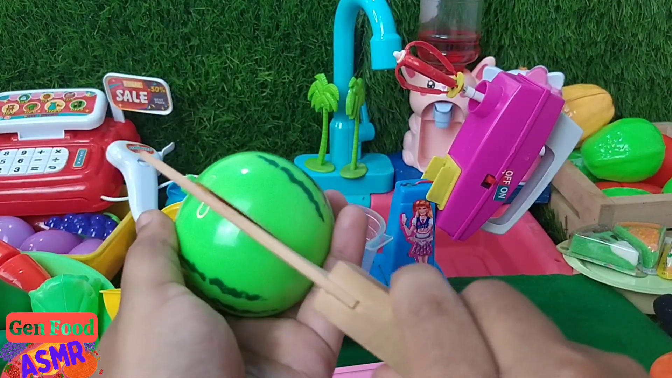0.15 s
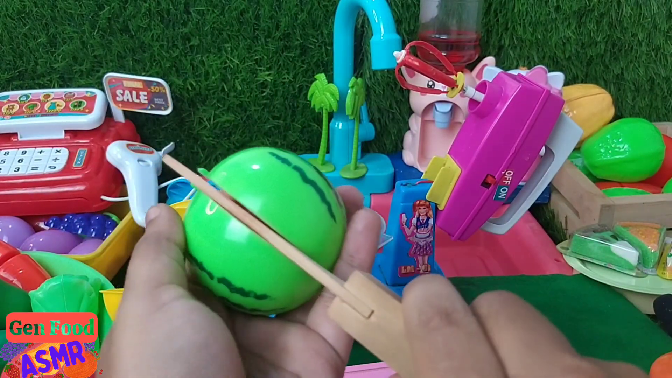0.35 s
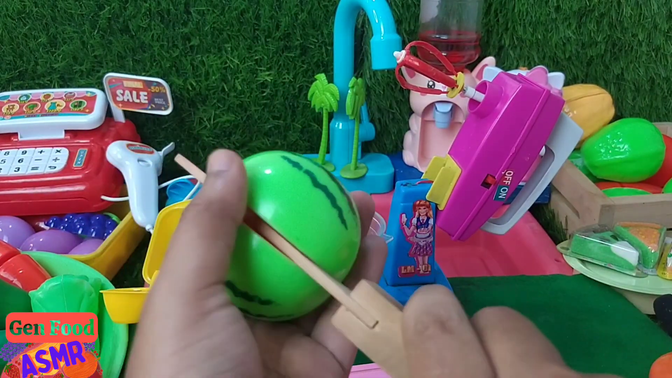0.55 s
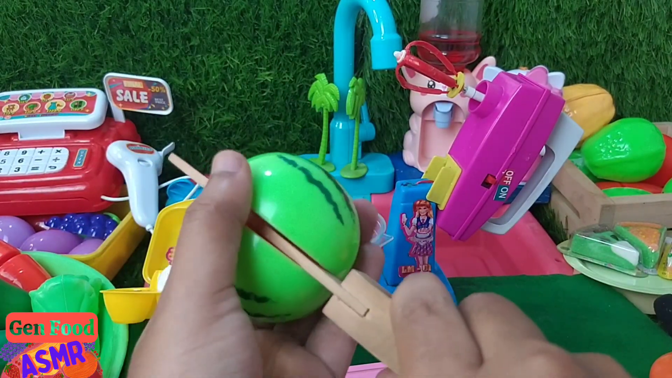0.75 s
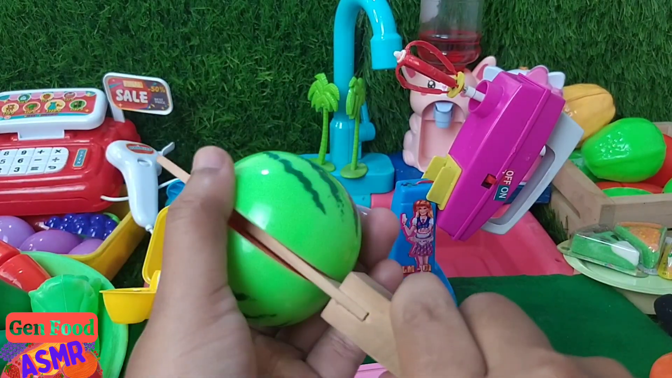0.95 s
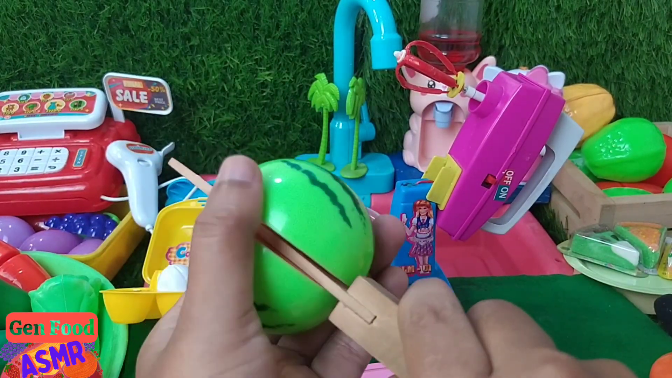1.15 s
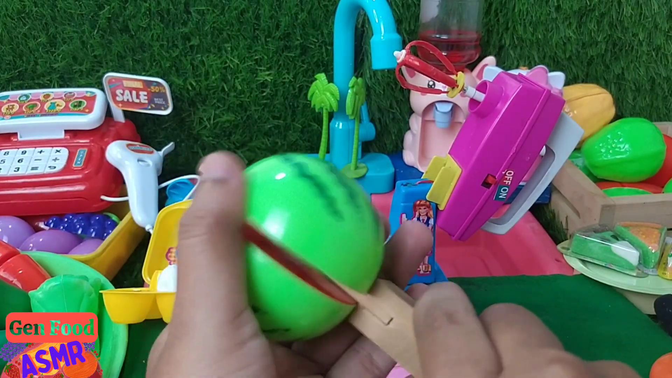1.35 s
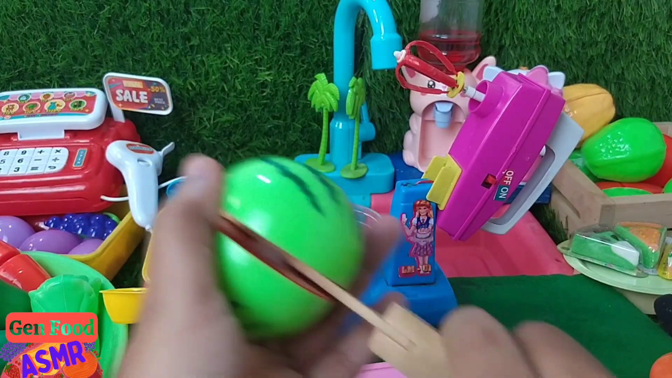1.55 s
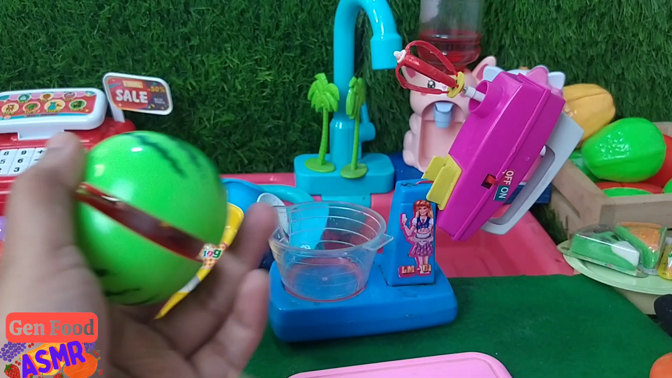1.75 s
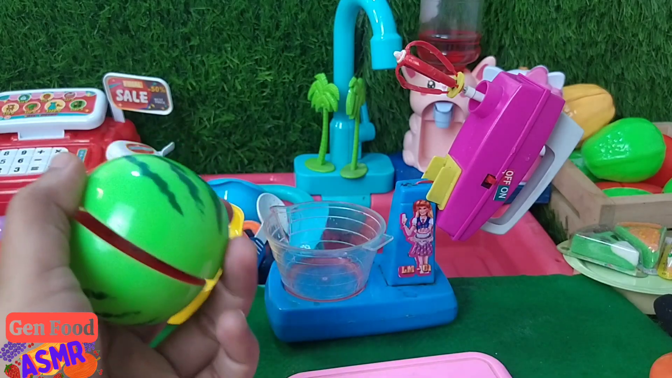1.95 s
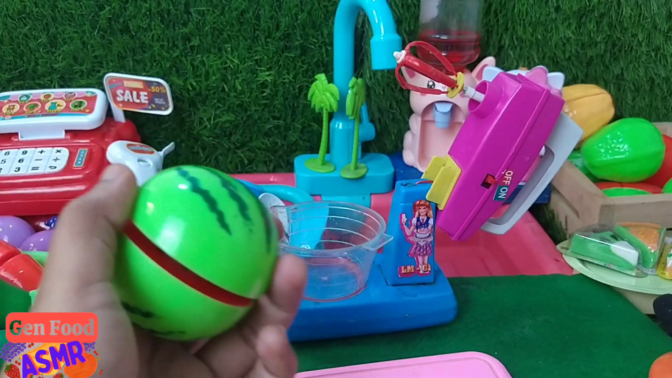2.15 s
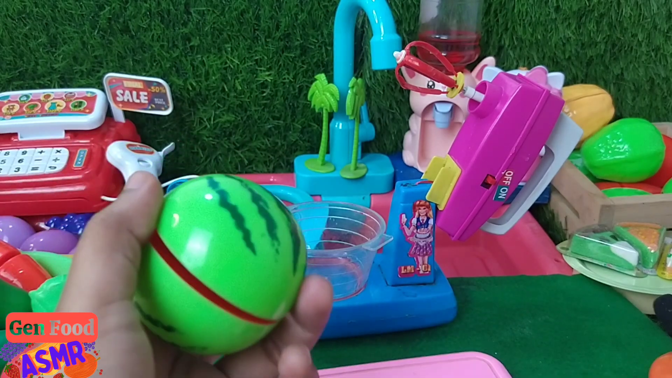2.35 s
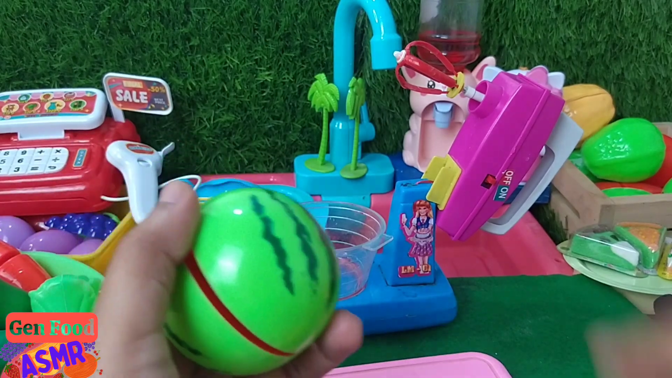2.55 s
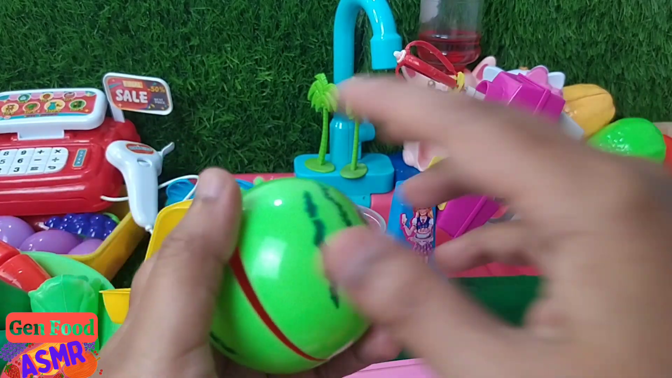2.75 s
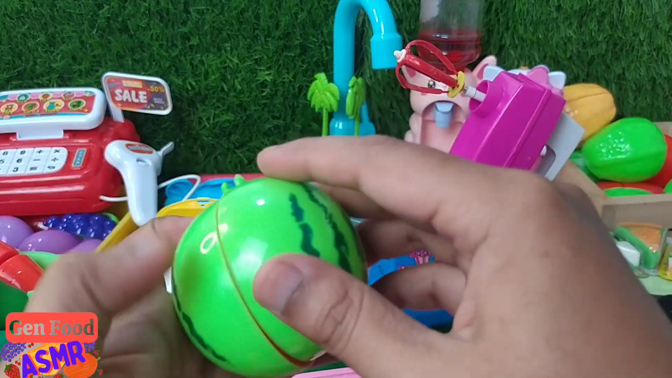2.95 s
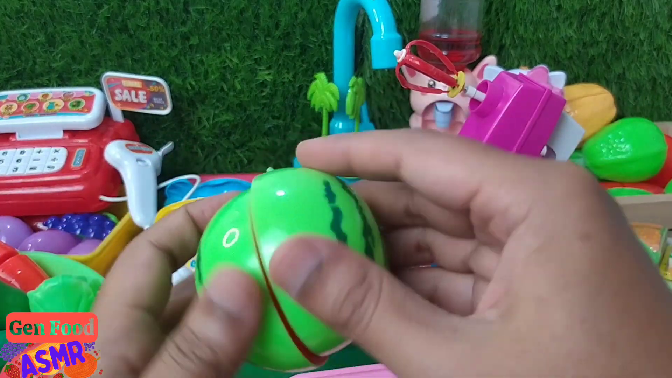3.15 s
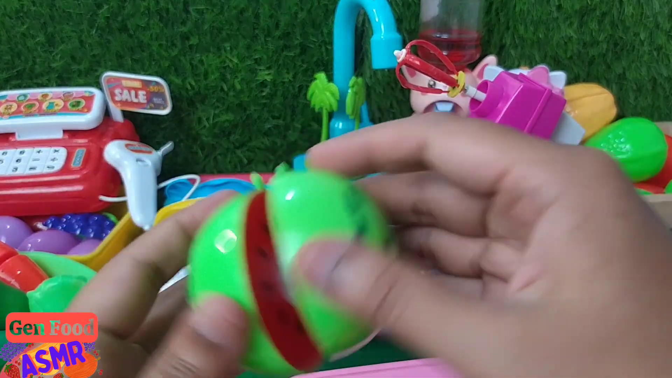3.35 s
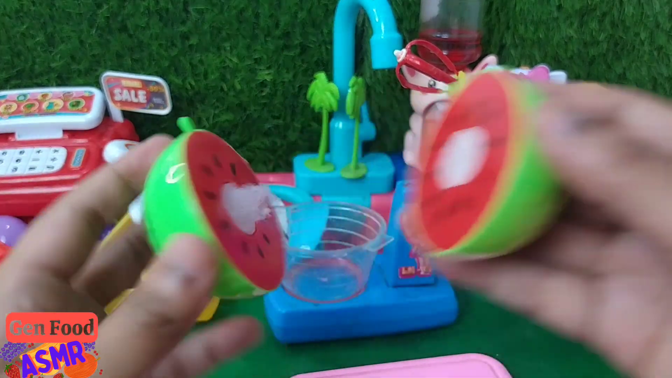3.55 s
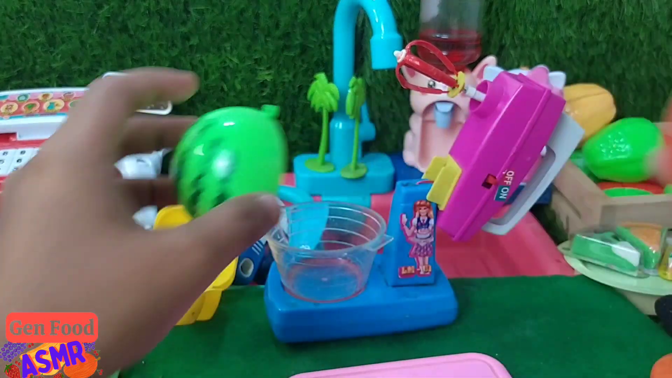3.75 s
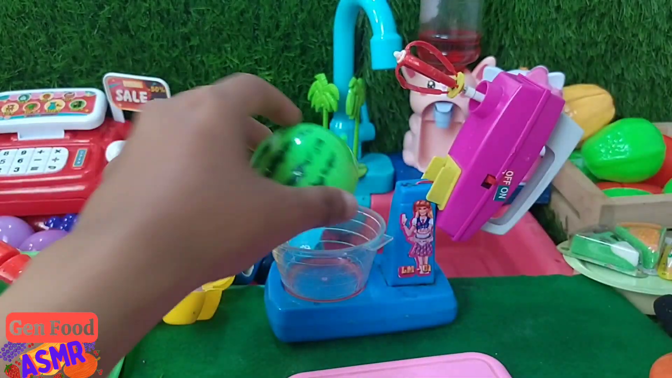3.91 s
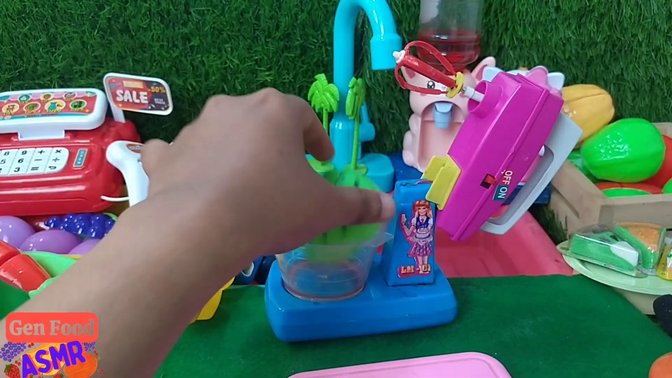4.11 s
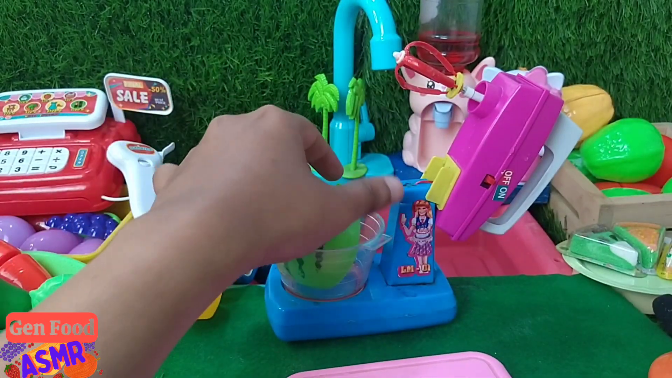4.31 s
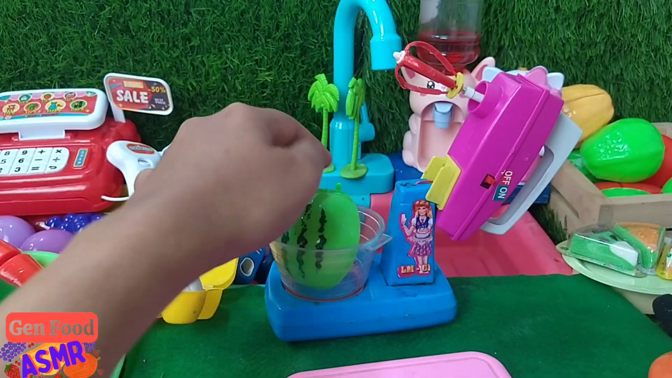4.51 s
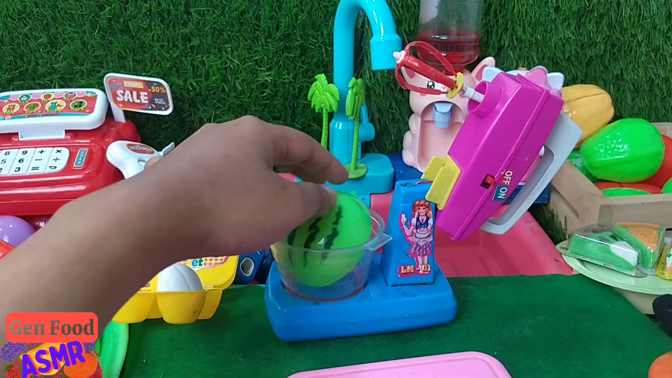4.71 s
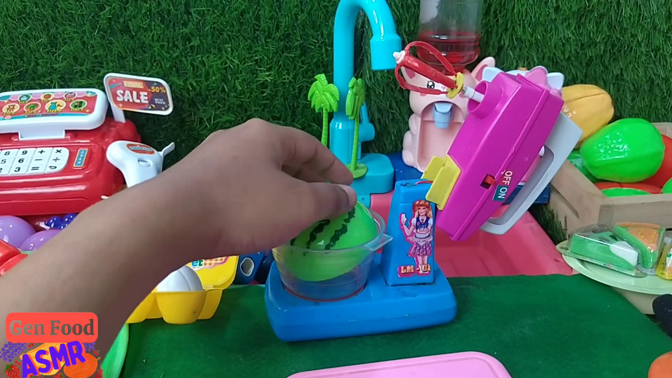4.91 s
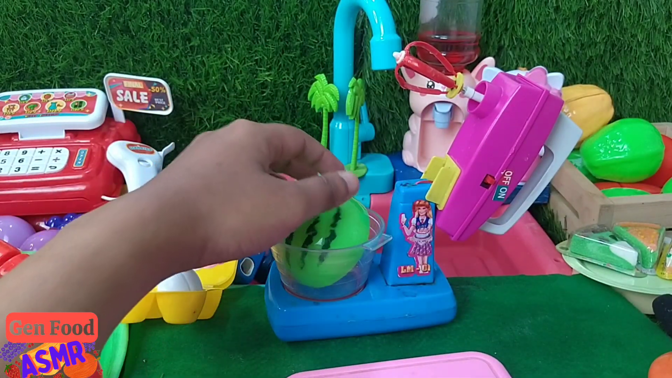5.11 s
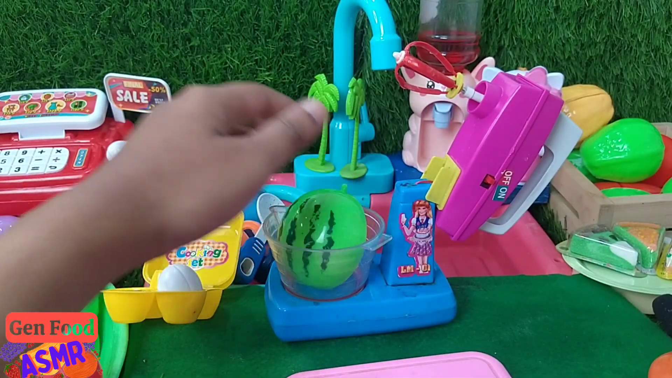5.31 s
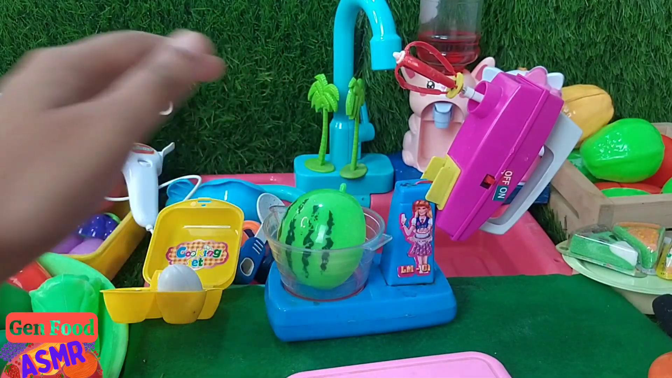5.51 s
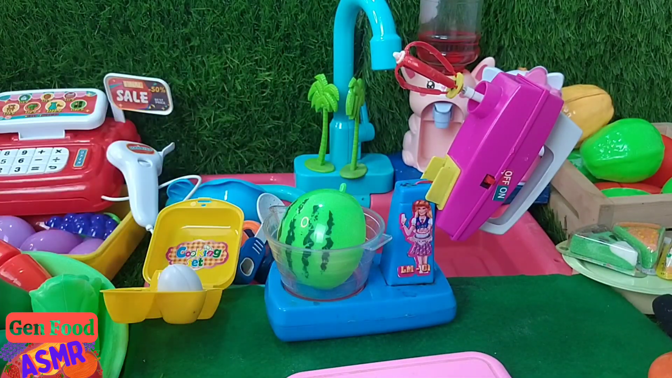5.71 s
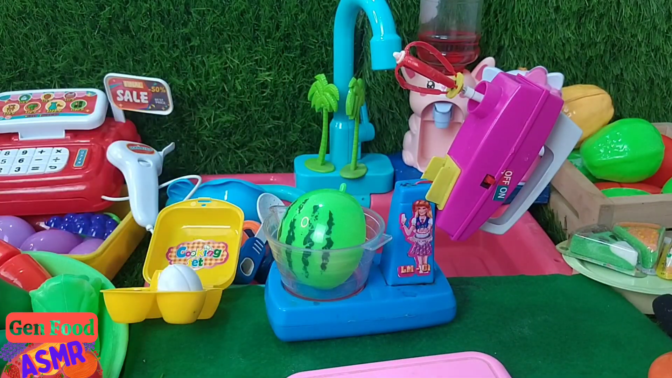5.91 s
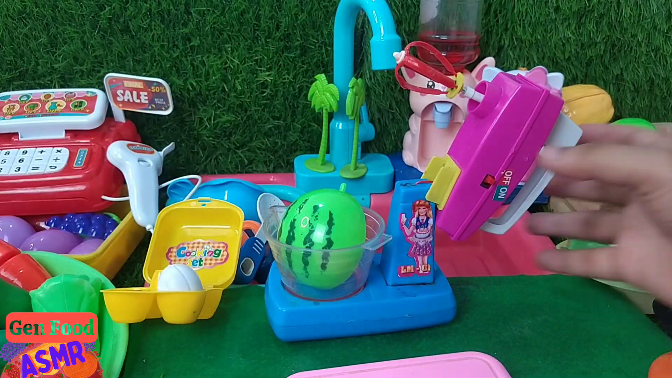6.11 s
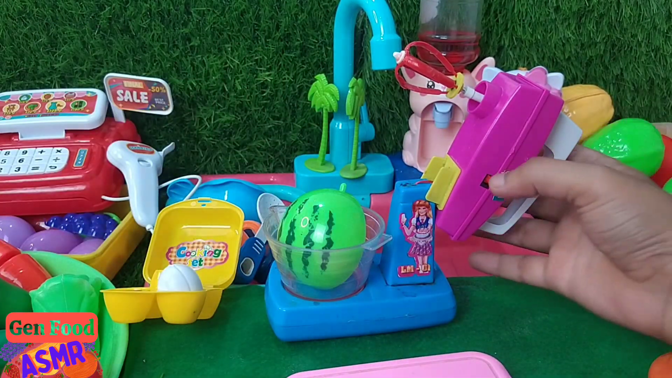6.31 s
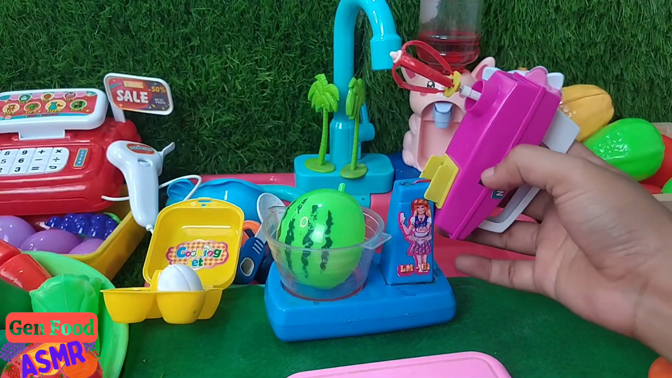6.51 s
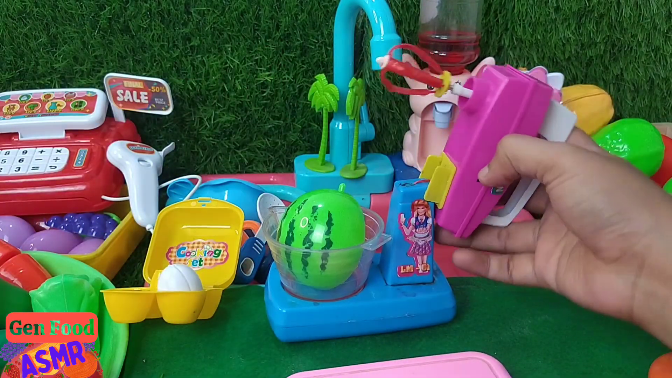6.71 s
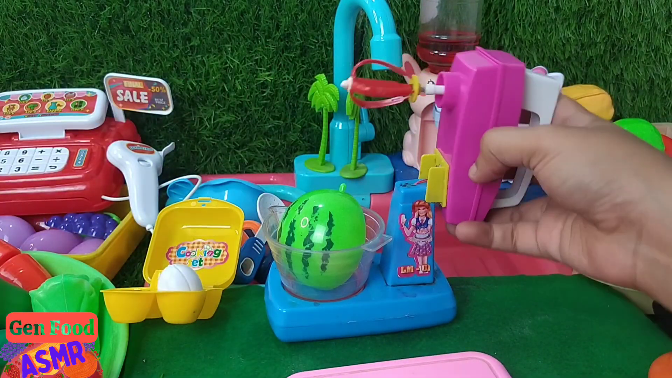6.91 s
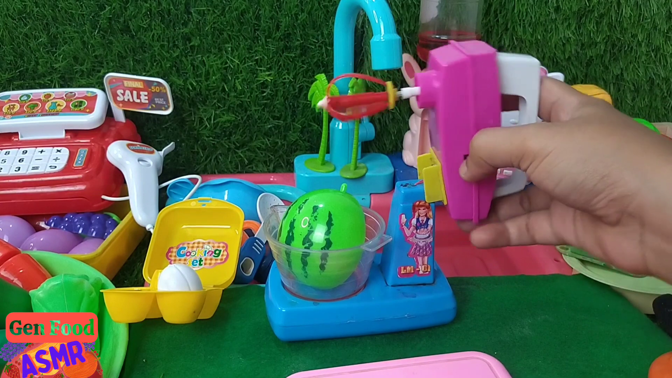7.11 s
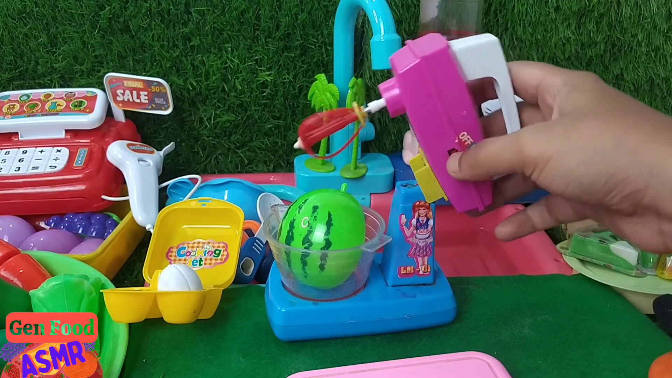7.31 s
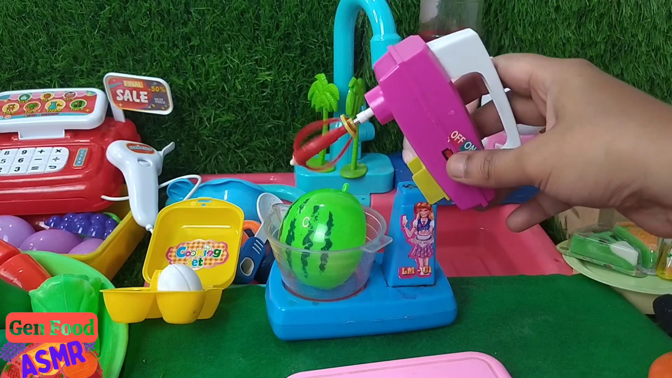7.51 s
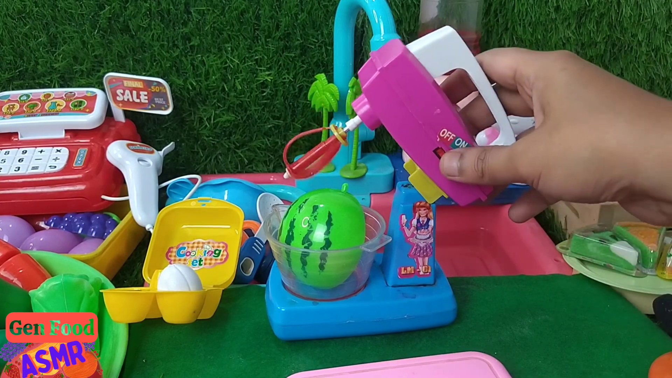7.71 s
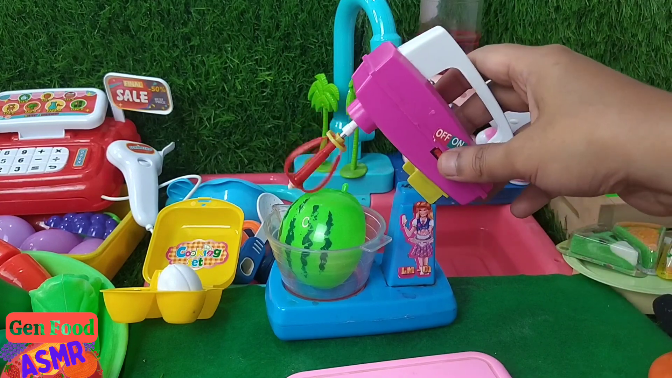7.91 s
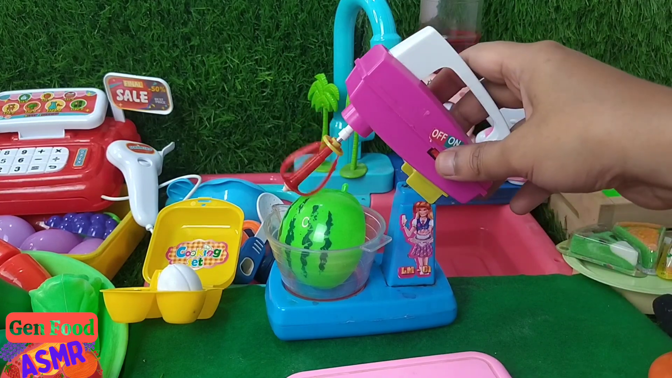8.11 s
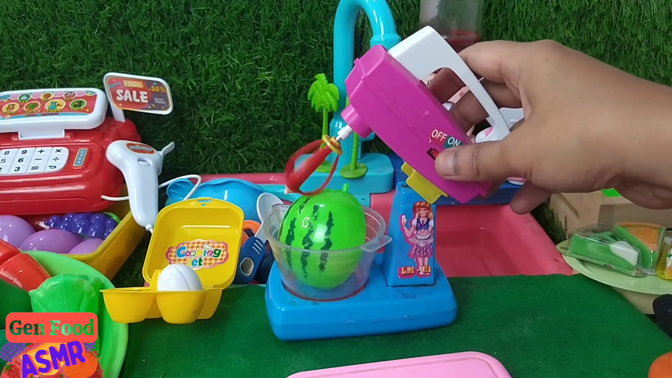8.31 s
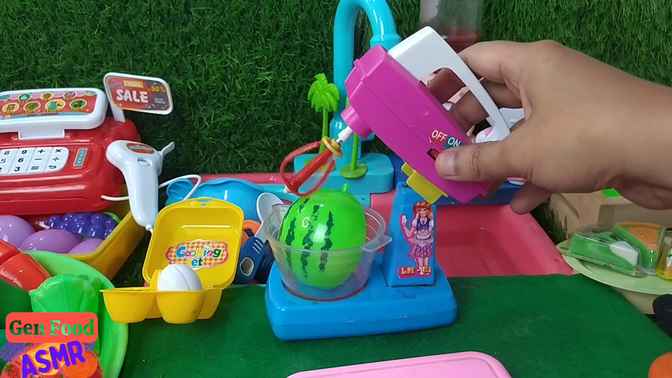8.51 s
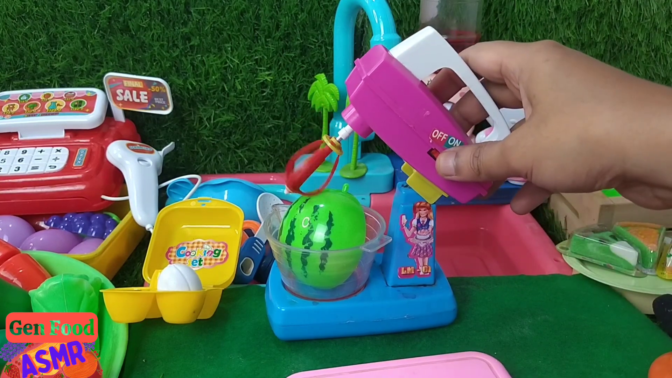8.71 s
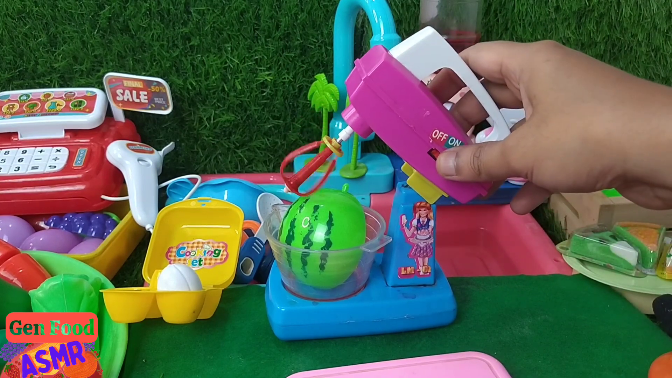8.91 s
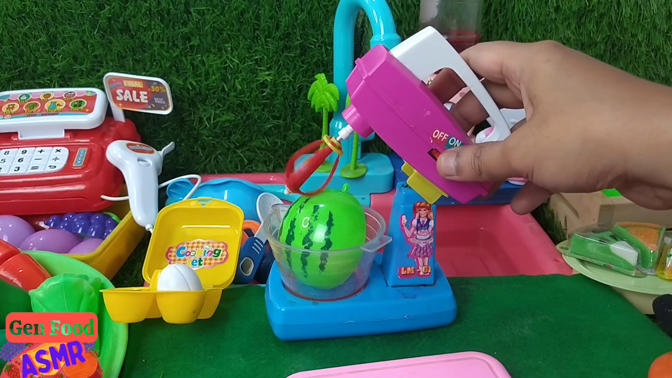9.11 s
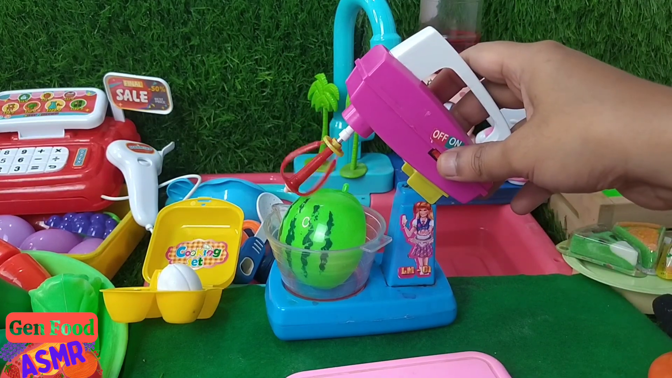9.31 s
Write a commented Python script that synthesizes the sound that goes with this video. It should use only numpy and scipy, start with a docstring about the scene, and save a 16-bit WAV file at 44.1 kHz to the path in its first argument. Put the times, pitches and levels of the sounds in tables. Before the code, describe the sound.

Close microphone on a tabletop of plastic toys, faint hiss and low room drone. Scratchy sawing and tearing of a fastener seam, small hollow knocks, a brief pop as pieces separate, then a brighter rattling drop into a thin cup. A quiet pause, a few tiny taps, a hard click, and a toy blender's gear buzz and squeal rise quickly, then keep creeping upward in pitch.

```python
"""Indoors at a table, in a room with a wide, even reverberation: a toy knife saws through the hook-and-loop
seam of a hollow plastic melon, and the halves click, come apart and drop into a plastic jug.
Then a toy hand blender is picked up and snapped on; its motor is close, central and dry. It hums as a sine
at the shaft rate, its gears whine at multiples of that rate and rattle as random tooth jumps.
Contacts are noise bursts, rubs are grains coloured by the plastic, hollow bodies ring as decaying sines."""
import sys
import numpy as np
from scipy import signal
from scipy.fft import rfft, irfft, next_fast_len
from scipy.io import wavfile
from scipy.ndimage import uniform_filter1d

SR = 44100
rng = np.random.default_rng(int(sys.argv[2]) if len(sys.argv) > 2 else 0)


def persist_wave(psi):
    """Save psi, clipped to +-1, as 16-bit WAV."""
    counts = np.round(np.clip(psi, -1, 1) * 32767).astype(np.int16)
    wavfile.write(sys.argv[1], SR, np.atleast_2d(counts).T)


N = 412335
TIME = np.arange(N) / SR  # s


def from_db(db):
    """Decibels to gain."""
    return 10 ** (np.asarray(db) / 20)


def rms_one(x):
    """Scale to unit rms over all channels."""
    return x / np.sqrt(np.mean(x ** 2) + 1e-20)


def unit_energy(x):
    """Scale each channel of a short sound to unit energy."""
    return x / np.sqrt(np.sum(x ** 2, axis=1, keepdims=True))


def at_hz(points, hz):
    """Read a table on a log-frequency axis."""
    f, value = np.transpose(points)
    return np.interp(np.log(np.maximum(hz, 1)), np.log(f), value)


def colour(x, spectrum):
    """Shape a steady sound by a spectrum in dB."""
    size = next_fast_len(N)
    hz = np.arange(size // 2 + 1) * SR / size
    return irfft(rfft(x, size) * from_db(at_hz(spectrum, hz)), size)[..., :N]


def band(x, low_hz, high_hz):
    """Causal band-pass."""
    edges = [low_hz, min(high_hz, .45 * SR)]
    return signal.sosfilt(signal.butter(2, edges, "band", fs=SR, output="sos"), x + 1e-18)


def resonate(x, hz, width):
    """One resonance, gain 1 on top."""
    r = np.exp(-np.pi * width / SR)
    feedback = [1, -2 * r * np.cos(2 * np.pi * hz / SR), r * r]
    return signal.lfilter(np.array([1, 0, -1]) * (1 - r * r) / 2, feedback, x + 1e-18)


def decaying(impulses, decay_s):
    """Give every impulse an exponential decay."""
    return signal.lfilter([1], [1, -np.exp(-1 / (decay_s * SR))], impulses + 1e-18)


def drift(rate):
    """Slow chance with a spread near 1 and `rate` knots per second."""
    knots = np.arange(0, N / SR + 1, 1 / rate)
    return np.interp(TIME, knots, rng.standard_normal(len(knots)))


def stereo(mid, side):
    """Left and right from mid and side."""
    return np.array([mid + side, mid - side])


def add(out, s, sound):
    """Mix a short sound in at time s."""
    i = int(s * SR)
    out[..., i:i + sound.shape[-1]] += sound[..., :N - i]


# Hiss spectrum of the place, before scaling to AIR_DB: (frequency [Hz], relative density [dB per Hz])
AIR_SPECTRUM = [(25, -11), (45, -9), (70, -13.5), (90, -22), (170, -19), (220, -23.5), (340, -22.5),
                (700, -31.5), (1300, -40), (3000, -43.5), (6500, -48), (9500, -39), (12000, -49),
                (15500, -57)]
# Stereo width of the hiss: (frequency [Hz], side gain [dB])
AIR_WIDTH = [(60, -3.5), (200, -5.5), (700, -3), (4000, -1)]
# Low room drone: (frequency [Hz], waver [Hz], rms level [dB])
DRONE = [(26.3, 1.5, -55.5), (63, 4.2, -72.5)]
AIR_DB = -63


def background():
    """Faint hiss over a low drone of sines whose pitch wavers."""
    mid, side = rms_one(colour(rng.standard_normal((2, N)), AIR_SPECTRUM))
    drone = 0
    for hz, waver, db in DRONE:
        phase = 2 * np.pi * np.cumsum(hz + waver * drift(2.7)) / SR
        drone = drone + from_db(db) * np.sin(phase) * np.sqrt(2)
    return from_db(AIR_DB) * stereo(mid, colour(side, AIR_WIDTH)) + drone


def contact(decay_s, rise_s=0.00082, size=2048, count=4):
    """Tiny slips dying in milliseconds, near even in spectrum so the body alone colours them; unit energy."""
    envelope = np.exp(-TIME[:size] / decay_s) * (1 - np.exp(-TIME[:size] / rise_s))
    burst = rng.standard_normal((2, size)) * envelope
    # flatten the spectrum and restore the envelope in turns
    for _ in range(count):
        even = irfft(np.exp(1j * np.angle(rfft(burst))), size)
        local_rms = np.sqrt(np.abs(uniform_filter1d(even ** 2, size=48)) + 1e-20)
        burst = envelope * even / local_rms
    return unit_energy(burst)


# Bright modes of the thin shells: (frequency [Hz], width [Hz], gain [dB])
SHELL_MODES = [(1570, 1000, -1), (2810, 890, 0), (3790, 710, -1), (5500, 2200, -2.5), (9256, 3560, 11),
               (9837, 3100, 10.5), (13600, 3000, -26.5)]


def shell(x):
    """The bright modes of thin plastic, signs alternating."""
    out = 0
    for k, (hz, width, db) in enumerate(SHELL_MODES):
        out = out + (-1) ** k * from_db(db) * resonate(x, hz, width)
    return out


# Single hooks letting go and fingernail ticks: (time [s], level before snap_db [dB])
HOOK_SNAPS = [(0.105, -41.5), (0.8845, -33.5), (0.908, -35), (0.973, -36), (1.001, -25), (1.012, -27),
              (1.056, -35), (1.1418, -25.5), (1.171, -40), (1.2221, -25.5), (1.257, -41), (1.2797, -23),
              (1.303, -31), (1.338, -27), (1.4982, -29), (1.618, -14.5), (2.442, -27.5), (2.458, -45),
              (3.272, -36), (3.487, -38), (7.143, -42)]


def snaps(snap_db=21, decay_s=0.0013):
    """Lone hooks spring free, or fingernails tick, and flick the shell."""
    out = np.zeros((2, N))
    for s, db in HOOK_SNAPS:
        add(out, s, from_db(db + snap_db) * contact(decay_s, rise_s=0.00021))
    return shell(out)


# Reverberation time of the place: (frequency [Hz], time to fall 60 dB [s])
ROOM_DECAY = [(150, 0.79), (500, 0.91), (2500, 0.9), (8000, 0.68), (14000, 0.42)]
# Stereo width of the tail: (frequency [Hz], side gain relative to the middle [dB])
ROOM_WIDTH = [(150, -15), (400, -11.5), (1200, 5.5), (4000, -0.5)]


def room(x, build_s=0.00099):
    """A diffuse tail that dies band by band, narrower in the bass; unit energy."""
    t, tail = TIME[:SR], 0
    edges = np.geomspace(70, 17000, 12)
    for low, high in zip(edges, edges[1:]):
        hz = np.sqrt(low * high)
        mid, side = band(rng.standard_normal((2, SR)), low, high)
        width = from_db(at_hz(ROOM_WIDTH, hz))
        fade = np.exp(-np.log(1000) * t / at_hz(ROOM_DECAY, hz))
        tail = tail + stereo(mid, width * side) / np.hypot(1, width) * fade
    tail = rms_one(tail * (1 - np.exp(-t / build_s))) / np.sqrt(SR)
    return signal.fftconvolve(x[:1], tail, axes=1)[:, :N]  # fed by the left channel


# Plastic contacts: (time [s], clack level before clack_db [dB], clack low edge [Hz], clack top edge [Hz],
# crack level before crack_db [dB], clack decay [s])
CONTACTS = [(0.35, -32, 625, 940, -34, 0.0047), (2.378, -30.5, 1050, 1470, -24, 0.0022),
            (2.564, -36, 1170, 2420, -35.5, 0.0052), (2.594, -33.5, 680, 1390, -66, 0.004),
            (2.623, -41, 368, 1060, -67.5, 0.0076), (2.646, -39, 804, 2000, -69, 0.003),
            (2.683, -40.5, 600, 1230, -72, 0.0033), (3.138, -30.5, 670, 1300, -34, 0.0022),
            (3.379, -47.5, 696, 1680, -49, 0.0042), (3.654, -36.5, 516, 1580, -43.5, 0.0079),
            (3.676, -29.5, 327, 1480, -58, 0.0054), (3.683, -37, 1660, 3400, -60, 0.014),
            (3.685, -26.5, 446, 1110, -46, .003), (4.389, -31, 300, 1600, -31.5, 0.0074),
            (4.411, -24.5, 1180, 1770, -26.5, 0.009), (4.428, -29, 1240, 2050, -25, 0.0068),
            (4.467, -27.5, 700, 1800, -32.5, 0.0046), (4.489, -30, 575, 865, -34.5, 0.0053),
            (5.133, -44.5, 750, 1370, -51.5, 0.0032), (5.519, -53, 300, 1000, -51.5, 0.0036),
            (6.744, -56, 863, 1160, -63, 0.0035), (6.839, -49.5, 910, 1160, -43.5, 0.0047),
            (6.958, -46, 860, 1170, -42, 0.0049), (7.059, -60, 900, 1390, -47, 0.0025),
            (7.099, -50.5, 810, 1190, -46.5, 0.003), (7.235, -19, 834, 1150, -23, 0.0027),
            (7.338, -35.5, 590, 1110, -39, 0.0054)]


def knocks(clack_db=24.5, crack_db=31.5, side_db=-13.0, crack_longer=1.5):
    """Each blow clacks the hand-damped wall and cracks the thin shell; a glancing contact lasts longer."""
    out, cracks = np.zeros((2, 2, N))
    for s, level, low_hz, top_hz, crack, contact_s in CONTACTS:
        mid, side = unit_energy(band(contact(contact_s), low_hz, top_hz))
        add(out, s, from_db(level + clack_db) * stereo(mid, from_db(side_db) * side))
        add(cracks, s, from_db(crack + crack_db) * contact(crack_longer * contact_s))
    return out + shell(cracks)


# Ringing of the hollow melon: (frequency [Hz], level relative to the clack entry [dB], 60 dB decay [s])
MELON_MODES = [(558, -11.5, 0.24), (622, -14, 0.52), (820, -15.5, 0.6)]
# Ringing of the blender case, same columns
CASE_MODES = [(833, -14.5, 0.5), (905, -14, 0.3), (968, -13, 0.087)]
# Ringing of the jug, same columns
JUG_MODES = [(700, -13, 1.01), (1444, -5, 0.3), (1840, -7.5, 0.73), (1940, -7, 0.33)]
# Runs of blows on melon, case and jug, each run ringing once: (start [s], end [s])
MELON_SPANS = [(.3, .4), (3.67, 3.7)]
CASE_SPANS = [(7.2, 7.3)]
JUG_SPANS = [(4.38, 4.5)]


def hollow(modes, spans, spread=0.752):
    """The hardest blow of a run rings a hollow body; modes differ slightly in phase and level per side."""
    out, t = np.zeros((2, N)), TIME[:SR]
    for start, end in spans:
        level, s = max((row[1], row[0]) for row in CONTACTS if start < row[0] < end)
        for hz, db, t60 in modes:
            strength = from_db(level + db + rng.standard_normal((2, 1)))
            wave = np.sin(2 * np.pi * hz * t + spread * rng.standard_normal((2, 1)))
            fade = np.exp(-np.log(1000) * t / t60)
            onset = np.minimum(t * hz, 1)  # rises over one cycle
            add(out, s, strength * wave * fade * onset)
    return out


STROKE_ATTACK_S, STROKE_RELEASE_S = 0.02, 0.017


def stroke(length_s):
    """Pressure builds, holds and lets go."""
    t = TIME[:SR]
    release = np.exp(-np.maximum(t - length_s, 0) / STROKE_RELEASE_S)
    return np.minimum(t / STROKE_ATTACK_S, 1) * release


# Strokes of the knife through the seam, then of fingers over plastic:
# (start [s], length before release [s], level before rub_db and clumping [dB])
RUB_STROKES = [(0.429, 0.042, -42.5), (0.593, 0.25, -54), (0.874, 0.14, -49.5), (0.986, 0.08, -38.5),
               (1.085, 0.26, -43.5), (1.318, 0.1, -41.5), (1.478, 0.091, -43.5), (1.85, 0.11, -37.5),
               (3.23, 0.18, -57), (3.381, 0.049, -48), (3.515, 0.085, -56), (4.3, 0.1, -66),
               (5.81, 0.054, -61), (6.4, 0.38, -74), (7.078, 0.091, -48.5)]
# Parts that grate ever harder until they let go: (time of release [s], level [dB], build-up [s])
RIPS = [(1.003, -36, 0.013), (1.605, -40, 0.043), (1.634, -23, 0.015), (3.691, -37.5, 0.016),
        (7.223, -32.5, 0.0026), (7.236, -16, 0.0037)]
# Colour of hooks and ridges on plastic: (frequency [Hz], relative density [dB per Hz])
RUB_SPECTRUM = [(150, -23), (300, -12.5), (550, -10), (850, -3), (1400, -7), (2500, -6), (3500, -11.5),
                (4700, -13), (6500, -7.5), (8000, -6), (9300, 1), (10500, -4), (12000, -12.5),
                (15500, -21.5)]


def rubbing(rub_db=-2.0, per_s=1500, spread_db=1.5, clump_db=4.0, release_s=0.0033):
    """Hundreds of small hooks and ridges slip in clumps; in a rip they merge into a swelling rasp."""
    level = np.zeros(N)
    for s, length_s, db in RUB_STROKES:
        add(level, s, from_db(db) * stroke(length_s))
    strength = from_db(spread_db * np.minimum(rng.exponential(1, N), 4))
    slips = (rng.random(N) < per_s / SR) * strength * rng.choice([-1, 1], (2, N))
    slip_decay = np.exp(-TIME[:256] / 0.00043)[None] ** 2
    grains = signal.fftconvolve(slips, slip_decay, axes=1)[:, :N] * rng.standard_normal((2, N))
    swell = 0
    for s, db, build_s in RIPS:
        log_swell = np.minimum((TIME - s) / build_s, (s - TIME) / release_s)
        swell = swell + from_db(db) * np.exp(np.maximum(log_swell, -20))
    rasp = rms_one(colour(rng.standard_normal((2, N)), RUB_SPECTRUM))
    clumps = from_db(rub_db + clump_db * drift(60))
    return clumps * level * rms_one(colour(grains, RUB_SPECTRUM)) + swell * rasp


# The wooden blade along the hollow wall: (start [s], length before release [s], level [dB])
BLADE_SCRAPES = [(1.24, 0.17, -50.5), (1.523, 0.085, -43), (1.812, 0.099, -46)]


def scraping(per_s=450, decay_s=0.001):
    """The blade sticks and slips on the wall, a coarse rasp below the hiss of the hooks."""
    level = np.zeros(N)
    for s, length_s, db in BLADE_SCRAPES:
        add(level, s, from_db(db) * stroke(length_s))
    slips = decaying(rng.random(N) < per_s / SR, decay_s)
    return level * rms_one(band(slips * rng.standard_normal((2, N)), low_hz=750, high_hz=2560))


# Soft bumps of hands and pieces on the table: (time [s], direct level [dB], pitch [Hz])
TABLE_BUMPS = [(2.378, -39.5, 198), (2.574, -39, 225), (2.628, -44, 135), (3.685, -49, 291.4),
               (2.687, -38, 258), (4.439, -40.5, 115), (4.502, -47.5, 130), (7.347, -44.5, 243),
               (7.387, -50, 120)]


def bumps(decay_s=0.0028, size=4096):
    """Padded blows give a few slow cycles only."""
    out, t = np.zeros((2, N)), TIME[:size]
    for s, db, hz in TABLE_BUMPS:
        add(out, s, from_db(db) * np.sin(2 * np.pi * hz * t) * np.exp(-t / decay_s))
    return out


# Loose plastic chattering after blows, and faint rustles of handling:
# (time [s], level before the fade [dB], fade [s], low edge [Hz], top edge [Hz])
CHATTERS = [(3.686, -38.5, 0.036, 1500, 3260), (4.409, -29.5, 0.05, 950, 2000),
            (5.53, -59, 0.075, 300, 810), (7.112, -56.5, 0.08, 900, 3200)]


def rattles(per_s=260, decay_s=0.0013, spread_db=3.5):
    """Loose plastic chatters or rustles in tiny random bounces that die away."""
    out, t = np.zeros((2, N)), TIME[:SR // 2]
    for s, db, fade_s, low_hz, top_hz in CHATTERS:
        strength = from_db(spread_db * rng.standard_normal(len(t)))
        bounces = (rng.random(len(t)) < per_s / SR) * strength
        noise = rng.standard_normal((2, len(t)))
        chatter = band(decaying(bounces, decay_s) * noise, low_hz, top_hz)
        add(out, s, from_db(db) * rms_one(chatter) * np.exp(-t / fade_s))
    return out


# speeds in turns per s; the creep is in turns per s, per s
SWITCH_ON_S, KICK_SPEED, RUNNING_SPEED, SPIN_UP_S, CREEP_PER_S = 7.24, 31.95, 175.84, .4363, 14.694


def motor_speed():
    """The motor kicks in, spins up towards its running speed and keeps creeping faster; zero until then."""
    t = np.maximum(TIME - SWITCH_ON_S, 0)
    lag = (RUNNING_SPEED - KICK_SPEED) * np.exp(-t / SPIN_UP_S)
    return (t > 0) * (RUNNING_SPEED - lag + CREEP_PER_S * t)


# Resonances and notches of the drive: (frequency [Hz], width [Hz], boost [dB])
DRIVE_RESONANCES = [(151, 10, 4), (181, 14, 5), (1330, 130, 5), (1522, 70, 8), (1740, 100, 10),
                    (1860, 110, 5), (1995, 90, 6), (2105, 80, -10), (2270, 150, 9), (3080, 260, 12),
                    (3470, 200, 10), (3700, 120, -8), (4050, 180, 10), (4450, 90, 5), (4920, 70, 5)]


def flare_db(hz):
    """A rising tone flares or fades as it sweeps through the resonances and notches of the drive."""
    return sum(db / (1 + (2 * (hz - centre) / width) ** 2) for centre, width, db in DRIVE_RESONANCES)


def gear_play(per_s=330, jump=0.6, decay_s=0.00052, surge_db=0.3):
    """Loose teeth jump at random, some much harder than others, and the rattle wavers slightly."""
    jumps = (rng.random(N) < per_s / SR) * np.minimum(rng.exponential(1, N), np.pi)
    play = 1 + jump * decaying(jumps, decay_s)
    return rms_one(play * from_db(surge_db * drift(35)))


# Small 8-tooth gear and a faint lower partial of the motor:
# (multiple of the shaft rate [1], level relative to SMALL_GEAR_DB [dB])
SMALL_GEAR_TONES = [(6, -14), (8, 1)]
# Large 12-tooth gear, mesh tone with sidebands: (multiple [1], level relative to LARGE_GEAR_DB [dB])
LARGE_GEAR_TONES = [(10, -12), (11, -11), (11.25, -12), (12, -1), (13, -10)]
# High squealing tones of the drive: (multiple of the shaft rate [1], level relative to SQUEAL_DB [dB])
SQUEAL_TONES = [(24, 2.5), (29, -10), (36, -5.5), (48, -10)]
# Colour of the gear rattle: (frequency [Hz], relative density [dB per Hz])
RATTLE_SPECTRUM = [(70, -22), (220, -11), (480, -1.5), (760, -15), (950, -4.5), (1400, -3), (2050, -6.5),
                   (2450, -2.5), (3900, -7), (5350, -7), (5900, -12.5), (9000, -12.5), (12200, -14.5),
                   (13400, -9.5), (15500, -17.5)]
# Stereo width of the gear rattle: (frequency [Hz], side gain [dB])
RATTLE_WIDTH = [(200, -29), (400, -53), (700, -6), (1300, -20), (4400, -54), (8100, -3), (15000, -51)]
# Blender case: (frequency [Hz], width of each of two resonators in series [Hz], relative level [dB])
CASE_RESONANCES = [(337.5, 43, -0.5), (390, 120, 0), (280.6, 92, -8), (483, 230, -6.5), (1810, 22, -11),
                   (2690, 200, -7.5), (3170, 520, -2.5)]
GEAR_RATTLE_DB, RATTLE_POWER = -36.5, 1.5  # level at running speed; it grows as this power of the speed
SING_SPEED, SING_SPREAD = 137, 17  # the tones emerge around this speed (turns per s)
HUM_DB, SMALL_GEAR_DB, LARGE_GEAR_DB, SQUEAL_DB = -47, -48.5, -44.5, -51.5  # before flares and flutter
FLUTTER_DB = 1.7


def blender_motor(case_db=-5.0, wobble=0.0016):
    """The shaft hums, the gear teeth whine, and their loose play rattles the case."""
    speed = motor_speed()
    angle = 2 * np.pi * np.cumsum(speed * (1 + wobble * drift(90))) / SR
    rattle_level = from_db(GEAR_RATTLE_DB) * (speed / RUNNING_SPEED) ** RATTLE_POWER
    singing = (speed > 0) / (1 + np.exp((SING_SPEED - speed) / SING_SPREAD))
    shaft = from_db(HUM_DB + flare_db(speed) + FLUTTER_DB * drift(14)) * np.sin(angle)
    whine = 0
    groups = [(SMALL_GEAR_DB, SMALL_GEAR_TONES), (LARGE_GEAR_DB, LARGE_GEAR_TONES), (SQUEAL_DB, SQUEAL_TONES)]
    for level, tones in groups:
        for k, db in tones:
            tone_db = level + db + flare_db(k * speed) + FLUTTER_DB * drift(22)
            whine = whine + from_db(tone_db) * np.sin(k * angle)
    impacts = rng.standard_normal((3, N)) * gear_play()
    # the many small modes of the gearbox ripple the rattle's spectrum
    gearbox = signal.fftconvolve(impacts[:2], contact(decay_s=.012), axes=1)[:, :N]
    mid, side = rms_one(colour(impacts[:2] + .5 * gearbox, RATTLE_SPECTRUM))
    case = 0
    for hz, width, db in CASE_RESONANCES:
        ringing = resonate(resonate(impacts[2], hz, width), hz, width)
        case = case + from_db(db) * rms_one(ringing)
    gears = stereo(mid, colour(side, RATTLE_WIDTH)) + from_db(case_db) * rms_one(case)
    return rattle_level * gears + singing * (shaft + whine)


def scene(knock_wet_db=-3.0, rub_wet_db=-4.5, bump_wet_db=11.5):
    """Handling sounds in their reverberation; the blender's motor close, central and dry."""
    place = background()
    seam = snaps() + rubbing() + scraping()
    blows = knocks() + rattles()
    rings = hollow(MELON_MODES, MELON_SPANS) + hollow(JUG_MODES, JUG_SPANS) + hollow(CASE_MODES, CASE_SPANS)
    thumps = bumps()
    wet_blows, wet_seam = from_db(knock_wet_db) * blows, from_db(rub_wet_db) * seam
    tail = room(wet_blows + wet_seam + from_db(bump_wet_db) * thumps)
    return place + seam + blows + rings + thumps + tail + blender_motor()


CUTOFF_HZ = 15700


def record(dry):
    """Past the microphone, a steep elliptic low-pass cuts the top."""
    return signal.sosfilt(signal.ellip(10, .2, 80, CUTOFF_HZ, fs=SR, output="sos"), dry)


dry = scene()
out = record(dry)
persist_wave(out)
```